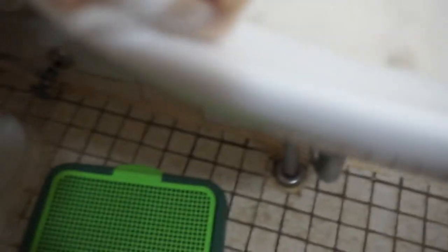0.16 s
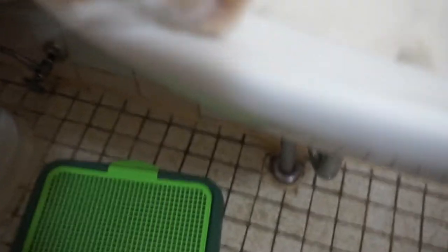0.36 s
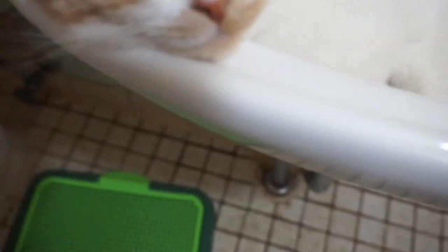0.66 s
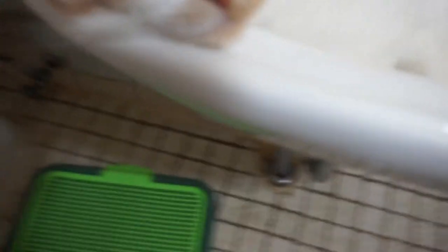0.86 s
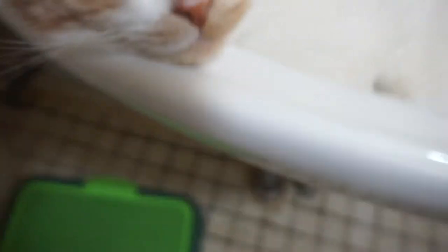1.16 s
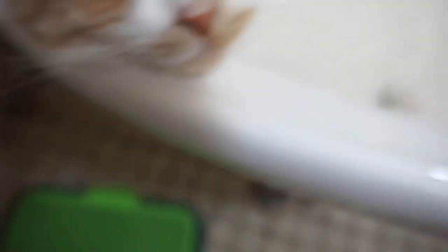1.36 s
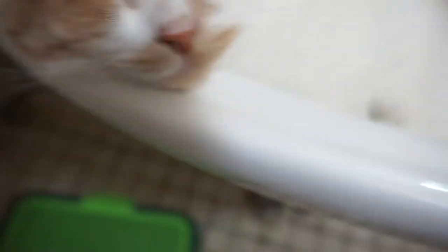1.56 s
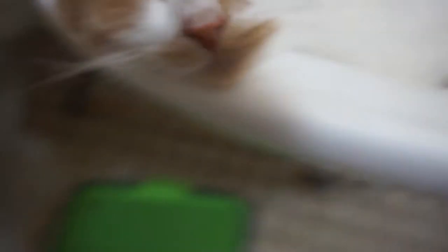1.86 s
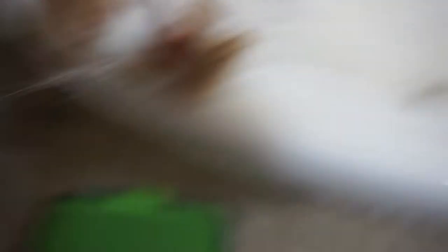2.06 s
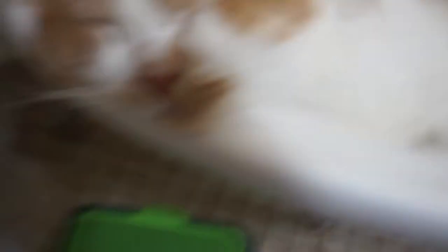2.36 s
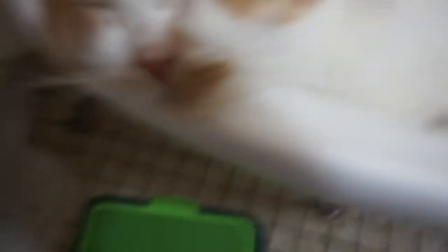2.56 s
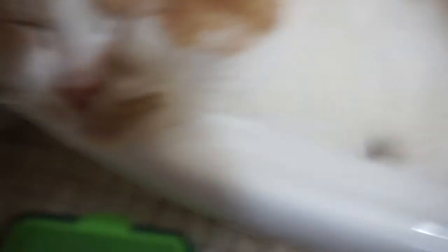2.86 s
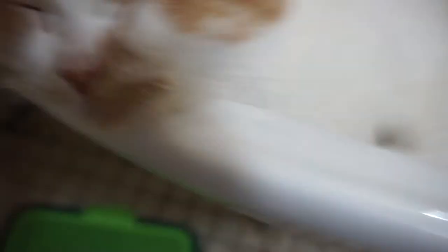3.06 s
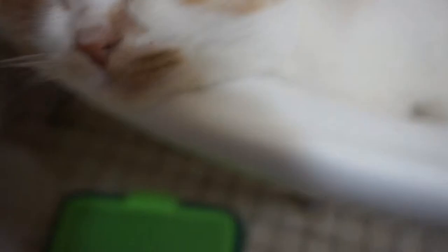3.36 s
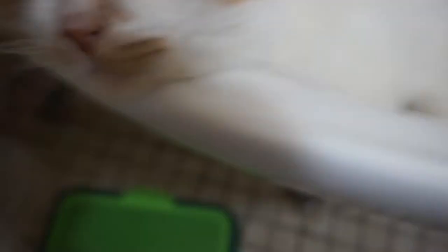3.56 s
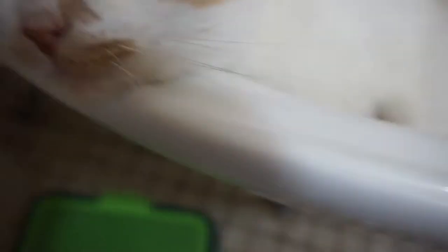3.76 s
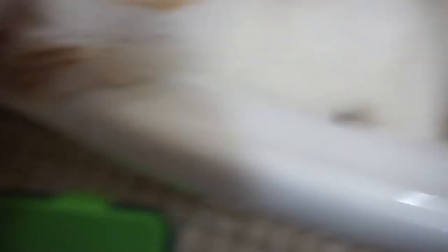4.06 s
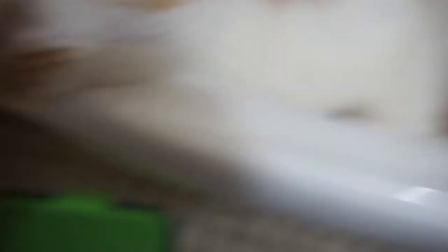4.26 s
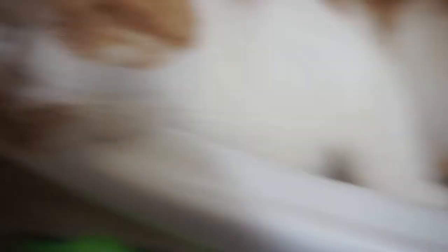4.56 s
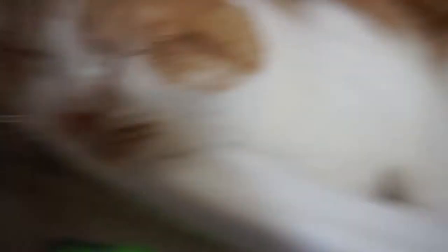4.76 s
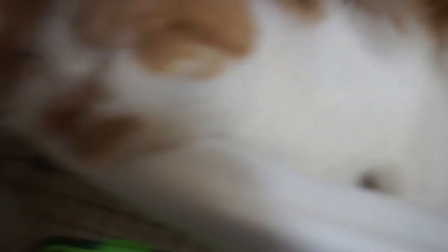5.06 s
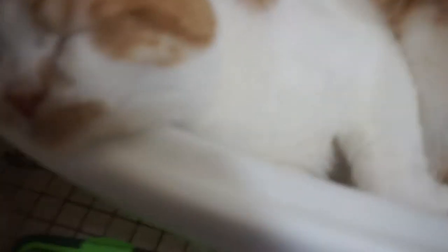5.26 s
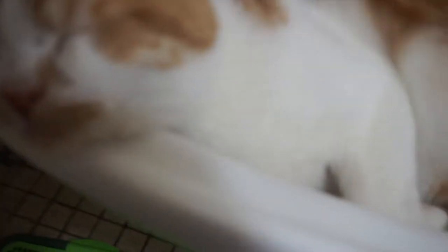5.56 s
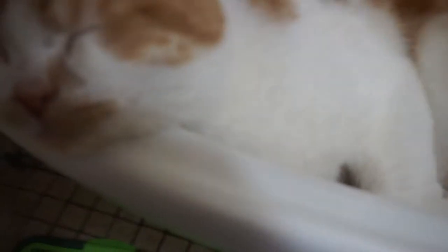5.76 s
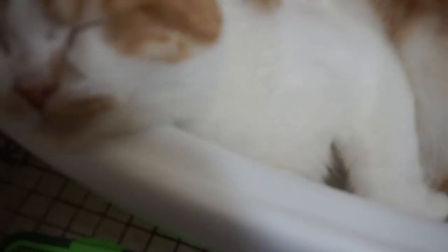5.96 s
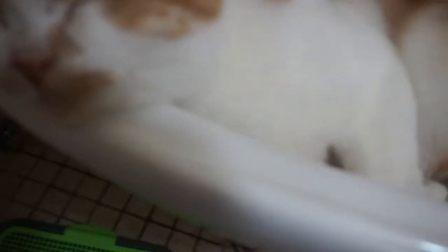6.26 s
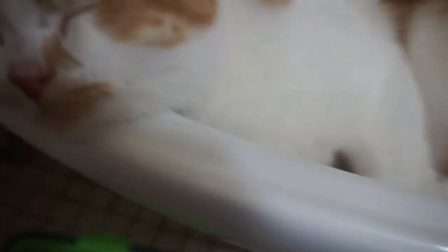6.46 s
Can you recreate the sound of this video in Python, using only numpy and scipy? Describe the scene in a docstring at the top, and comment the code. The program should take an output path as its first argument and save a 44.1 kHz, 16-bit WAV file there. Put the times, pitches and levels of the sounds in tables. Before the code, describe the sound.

A close stereo microphone catches short dry brush strokes on a cat's coat, with the basin knocked twice in the first second. For over three seconds the strokes become quick and regular, crowded with bouncing plastic ticks, soft thumps, little snaps and crackle. Then spaced, slightly whistling swishes return, with a final basin knock and a short tiled reflection.

```python
"""A brush sweeps a cat's fur in a small tiled bathroom, heard close: gritty rustle and faint room tone throughout,
slow strokes of hissing noise, and two early basin knocks (noise through resonant modes). Sparse snags (short
ringing puffs) and padded pats (low cycles under a slap) begin; then the work speeds up for a few seconds, with hard
bouncing plastic clicks (ticks over a hollow body), more snags and pats, and a crackle. Slow strokes return; the
basin is knocked once more. Click bodies, snags and slaps reach the left channel first."""
import sys
import numpy as np
from scipy import signal
from scipy.fft import rfft, irfft, next_fast_len
from scipy.io import wavfile
from scipy.ndimage import uniform_filter1d

SR = 44100
rng = np.random.default_rng(int(sys.argv[2]) if len(sys.argv) > 2 else 0)


def waveform_to_disk(signal):
    """Save audio, clipped to [-1, 1], as 16-bit WAV at the path in sys.argv[1]."""
    frames = np.transpose(np.atleast_2d(signal))
    scaled = np.clip(frames, -1, 1) * 32767
    samples = np.round(scaled).astype(np.int16)
    wavfile.write(sys.argv[1], SR, samples)


N = 292383
BUSY_START_S, BUSY_END_S = 1.68, 5.15  # the fast work

# Coat shifting under hand and brush: [t/s, level/dB]
COAT_RUSTLE = [(0.0, -63), (0.87, -66.5), (1.29, -65), (1.92, -54.5), (2.27, -56.5), (2.6, -49.5),
               (2.73, -60), (2.95, -75), (3.14, -58.5), (3.4, -67.5), (3.55, -59.5), (4.08, -64.5),
               (4.32, -60), (5.13, -58), (5.37, -67.5), (6.35, -67.5), (6.63, -75)]
# Bright spectrum of plastic ticks and basin cracks: [f/Hz, relative density/dB]
TICK_SPECTRUM = [(2400, -73), (4000, -30), (5400, -1.5), (7400, -1), (8600, -1), (9600, 8.5), (11100, 3),
                 (12300, -9), (16000, -102)]


def amp(db):
    """Amplitude factor of a level in dB."""
    return 10 ** (np.asarray(db) / 20)


def unit(x):
    """x scaled to rms 1."""
    return x / np.sqrt(np.mean(x ** 2) + 1e-20)


def along(points, hz):
    """Interpolates (Hz, value) points on a log frequency axis."""
    f, v = np.transpose(points)
    return np.interp(np.log(hz + 1), np.log(f + 1), v)


def filtered(x, response):
    """x filtered by a complex response of frequency."""
    size = next_fast_len(x.shape[-1] + 8192)
    spectrum = rfft(x, size) * response(np.fft.rfftfreq(size, 1 / SR))
    return irfft(spectrum, size)[..., :x.shape[-1]]


def causal(points):
    """Minimum-phase impulse response of energy 1 with this spectrum, by folding the cepstrum."""
    size = 2048
    magnitude = amp(along(points, np.fft.rfftfreq(size, 1 / SR)))
    cepstrum = irfft(np.log(np.maximum(magnitude, 1e-6)))
    cepstrum[1:size // 2] *= 2
    cepstrum[size // 2 + 1:] = 0
    impulse = irfft(np.exp(rfft(cepstrum)))[:size // 2]
    return impulse / np.linalg.norm(impulse)


def coloured(track, points):
    """Stereo track given a causal spectrum."""
    return signal.fftconvolve(track, causal(points)[None], axes=1)[:, :N]


def swell(t, top_s, blunt):
    """Contact force that builds to 1 at top_s and lets go again."""
    return (t / top_s * np.exp(1 - t / top_s)) ** blunt


def burst(top_s, blunt, apart):
    """Short stereo noise puff of set energy: a common part plus `apart` times one that differs per channel."""
    shape = swell(np.arange(SR // 20) / SR, top_s, blunt)
    common = rng.standard_normal(len(shape))
    puff = shape * (common + apart * rng.standard_normal((2, len(shape))))
    return unit(puff) * np.sqrt(np.mean(shape ** 2) * (1 + apart ** 2))


def add(track, s, sound):
    """Mixes a sound into the track at s seconds, cut at the end."""
    part = track[..., round(s * SR):][..., :sound.shape[-1]]
    part += sound[..., :part.shape[-1]]


def from_left(x, pan_db):
    """Delays the right channel so the left leads; pan_db is left over right."""
    lag_samples = 10
    return np.array([x[0] * amp(pan_db / 2), np.roll(x[1], lag_samples) * amp(-pan_db / 2)])


def rush(spectrum, likeness, patchy_db, grit_db):
    """Stereo friction noise of rms 1: a fast random gain makes grit, a random time-frequency gain makes patches."""
    grit = amp(grit_db * unit(uniform_filter1d(rng.standard_normal(N), size=24)))
    z = signal.stft(grit * rng.standard_normal((2, N)), nperseg=256)[2]
    field = uniform_filter1d(rng.standard_normal(z.shape[1:]), size=4, axis=0)
    field = uniform_filter1d(field, size=8, axis=1)
    pair = signal.istft(z * amp(patchy_db * unit(field)), nperseg=256)[1][:, :N]

    def mid_side(hz):
        # Mid/side split that yields the wanted left-right correlation
        angle = np.arccos(np.clip(along(likeness, hz), -1, 1)) / 2
        return amp(along(spectrum, hz)) * [np.cos(angle), np.sin(angle)]

    mid, side = filtered(pair, mid_side)
    return unit(np.array([mid + side, mid - side]))


def background():
    """Low gritty friction of the coat over a faint, steady room tone."""
    # Coat rustle spectrum: [f/Hz, relative density/dB]
    fur_spectrum = [(35, -37), (60, -25), (390, 3), (607, 10.5), (707, 5), (913, 7), (1660, -23),
                    (1930, -8.5), (3500, -2), (4550, -58), (7700, -120)]
    # Room tone spectrum: [f/Hz, relative density/dB]
    air_spectrum = [(300, -8), (1500, 3.5), (3000, -11), (4200, -9), (5500, -11), (10500, -10.5),
                    (11500, -25)]
    # Left-right likeness of both: [f/Hz, correlation/1]
    diffuse = [(130, 0.64), (500, 0.58), (1700, 0.041), (3500, 0.077), (9000, 0.35)]
    s, db = np.transpose(COAT_RUSTLE)
    envelope = amp(np.interp(np.arange(N) / SR, s, db))
    rustle = envelope * rush(fur_spectrum, diffuse, patchy_db=4.5, grit_db=4.1)
    return rustle + amp(-64.5) * rush(air_spectrum, diffuse, patchy_db=4.0, grit_db=-1.0)


def strokes():
    """Blunt-topped bristle hiss; firmer strokes rub the fur more, lower down; slow ones whistle and lie right."""
    # Brush strokes: [peak t/s, bristle hiss level before whistle and lean/dB, nominal half-length/ms]
    stroke_table = [(0.081, -45.5, 9.3), (0.115, -44, 19), (0.164, -56.5, 26), (0.407, -44, 17.8),
                    (0.468, -55.5, 22), (0.692, -42.5, 11), (0.75, -48.5, 57), (0.953, -43.5, 26.5),
                    (1.061, -53.5, 44), (1.179, -47, 30), (1.381, -40.5, 23), (1.487, -44, 21),
                    (1.572, -41.5, 24.7), (1.671, -44, 23.5), (1.754, -41, 22), (1.919, -46, 94),
                    (2.14, -49, 98), (2.223, -40.5, 13), (2.303, -44.5, 26), (2.486, -46.5, 105),
                    (2.6, -41, 30), (2.712, -42, 20), (2.82, -53.5, 28), (2.907, -47, 27), (3.01, -47, 25),
                    (3.105, -45, 28), (3.211, -42, 25), (3.308, -47.5, 23), (3.408, -47, 23),
                    (3.504, -45, 20), (3.613, -43, 31), (3.715, -47.5, 24), (3.832, -45, 29),
                    (3.92, -48.5, 27), (4.038, -47.5, 42), (4.13, -44, 22), (4.242, -44.5, 35),
                    (4.34, -46.5, 35), (4.44, -48.5, 41), (4.535, -46.5, 31), (4.641, -46, 33),
                    (4.75, -41.5, 26.6), (4.856, -47.5, 25), (4.962, -37, 22.5), (5.075, -52.5, 46),
                    (5.269, -39.5, 39), (5.447, -55.5, 38), (5.631, -39, 33), (5.75, -55.5, 74),
                    (5.915, -48.5, 7.9), (5.991, -40.5, 32), (6.28, -56, 15), (6.354, -39.5, 24.6),
                    (6.49, -58.5, 47), (6.625, -52, 18)]
    # Bristle hiss spectrum: [f/Hz, relative density/dB]
    bristle_spectrum = [(1060, -38), (1800, -16), (2380, -13.5), (2690, -10.5), (2960, -12), (3820, -17),
                        (5090, -13.5), (5630, -9.5), (7110, -12), (10600, -8.5), (11200, -6.5),
                        (11500, -96), (15000, -66), (22000, -120)]
    # Fur rub spectrum: [f/Hz, relative density/dB]
    rub_spectrum = [(150, -57), (250, -11.5), (1240, 3.5), (1720, -7), (2270, -6.5), (3610, -15.5),
                    (5000, 1), (6500, -120)]
    # Left-right likeness: [f/Hz, correlation/1]
    likeness = [(60, 0.7), (500, 0.82), (1700, 0.56), (3500, 0.18), (9000, 0.68)]
    # Balance of slow strokes: [f/Hz, left over right/dB]
    lean = [(500, -1.5), (1700, -2), (3500, -3.5), (9000, -0.8)]
    rise_share, fall_share = 0.79, 0.85  # of a stroke's half-length
    edge_db, blunt, steepen = 9.5, 0.61, 0.79  # flank fall scale, roundness of top, flank exponent
    firm_hiss_db, firm_rub_db, rub_db_per_hiss_db = -41.5, -51, 1.64
    slow_rub_db = -0.5  # added to the rub of slow strokes
    whistle_hz, whistle_width_hz, whistle_db = 5580, 350, -2.2

    hiss_power, rub_power, t = np.zeros(N), np.zeros(N), np.arange(N) / SR
    slow = (t < BUSY_START_S) | (t > BUSY_END_S)
    for s, hiss_db, half_ms in stroke_table:
        share = np.where(t < s, rise_share, fall_share)
        u = 1000 * (t - s) / max(half_ms, 4) / share
        shape_db = -edge_db * (np.hypot(u, blunt) - blunt) ** steepen
        rub_db = firm_rub_db + rub_db_per_hiss_db * (hiss_db - firm_hiss_db) + slow_rub_db * slow
        hiss_power += amp(shape_db + hiss_db) ** 2
        rub_power += amp(shape_db + rub_db) ** 2
    hiss = np.sqrt(hiss_power) * rush(bristle_spectrum, likeness, patchy_db=2.5, grit_db=2.0)
    rub = np.sqrt(rub_power) * rush(rub_spectrum, likeness, patchy_db=-1.5, grit_db=1.0)
    both = hiss + rub

    def slow_response(hz):
        whistle = 1 + amp(whistle_db) / (1 + ((hz - whistle_hz) / whistle_width_hz) ** 2)
        return whistle * amp(np.outer([.5, -.5], along(lean, hz)))

    return both * ~slow + filtered(both * slow, slow_response)


def knocks():
    """Struck basin: decaying noise, flaring briefly at the start, drives its modes; little radiates below the
    lowest."""
    # Basin knocks: [t/s, ring drive/dB, crack level/dB, upper-mode drive over ring/dB]
    knock_table = [(0.451, -37.5, -40.5, -11), (0.73, -32, -26.5, -5.5), (5.661, -30, -26, 1)]
    # Basin modes: [centre f/Hz, width/Hz, gain/dB]
    basin_modes = [(365, 390, 0), (562, 60, 17), (1158, 140, 10.5), (1493, 170, -1), (2010, 220, 3.5),
                   (2950, 170, 1.5), (3300, 370, -1.5)]
    upper_hz = 1700  # modes above this follow the upper-mode drive

    low, high, crack = np.zeros(N), np.zeros(N), np.zeros((2, N))
    t = np.arange(SR // 3) / SR
    for s, ring_db, crack_db, upper_db in knock_table:
        sustain = amp(-60 * t / 0.29)  # T60 in s
        flare = 1.5 * amp(upper_db - 60 * t / 0.019)
        shake = (sustain + flare) * rng.standard_normal(len(t))
        add(low, s, amp(ring_db) * shake)
        add(high, s, amp(ring_db + upper_db) * shake)
        add(crack, s, amp(crack_db) * burst(top_s=.0005, blunt=1.1, apart=.4))

    def modes(upper):
        def response(f):
            total = 0
            for k, (centre, width, db) in enumerate(basin_modes):
                if (centre > upper_hz) == upper:
                    band = 1j * f * width / (centre ** 2 - f * f + 1j * f * width)
                    total = total + (-1) ** k * amp(db) * band
            return total
        return response

    ring = filtered(low, modes(False)) + filtered(high, modes(True))
    ring = filtered(ring, lambda f: (1j * f / (260 + 1j * f)) ** 2)
    return ring, coloured(crack, TICK_SPECTRUM)


def snag(peak_db, hz):
    """A bristle snaps free: a noise puff rings for a cycle or two at its own pitch."""
    t = np.arange(SR // 100) / SR
    ring = np.exp(-hz * t) * np.sin(2 * np.pi * hz * t)
    puff = burst(top_s=0.0006, blunt=1.2, apart=0.9)[:, :len(t)]
    sound = signal.fftconvolve(puff, ring[None], axes=1)
    return amp(peak_db) * sound / np.abs(sound).max()


def snags(count, db):
    """Clear snags, plus a random crackle through the fast work whose level follows the coat rustle."""
    # Bristle catches and snaps free: [t/s, peak level before high-pass and pan/dB, ring f/Hz]
    snag_table = [(0.88, -28.5, 1790), (0.92, -37, 3280), (1.545, -34.5, 2300), (1.611, -31, 2230),
                  (1.657, -28.5, 1910), (1.773, -34, 2000), (2.178, -27, 2480), (2.212, -29, 2020),
                  (2.225, -30, 880), (2.236, -35, 1310), (2.347, -31, 1300), (2.369, -26.5, 3300),
                  (2.437, -37, 929), (2.516, -31, 2000), (2.575, -27, 2900), (2.912, -34, 2300),
                  (3.079, -33, 2700), (3.494, -41, 2000), (3.706, -34, 2000), (3.905, -35, 2200),
                  (3.947, -33.5, 1920), (3.966, -39, 3300), (3.984, -39, 3300), (4.304, -41, 1880),
                  (4.321, -31, 3100), (4.532, -40, 2200), (4.779, -26.5, 1400), (5.042, -34, 3310)]
    track = np.zeros((2, N))
    for s, peak_db, hz in snag_table:
        add(track, s, snag(peak_db, hz))
    for u, v, w in rng.random((count, 3)):
        s = BUSY_START_S + u * (BUSY_END_S - BUSY_START_S)
        rustle_db = np.interp(s, *np.transpose(COAT_RUSTLE))
        add(track, s, snag(rustle_db + db - 3.0 * np.log(v), hz=700 * 6.5 ** w))
    thin = filtered(track, lambda f: (1j * f / (350 + 1j * f)) ** 2)
    return from_left(thin, pan_db=-0.5)


def pats():
    """Padded contact: a few uneven low cycles (two inharmonic sines) swell and stop under a short slap."""
    # Pats: [t/s, thump drive/dB, thump f/Hz]
    pat_table = [(1.105, -55.5, 980), (1.676, -42.5, 920), (1.728, -33.5, 660), (1.917, -32, 617),
                 (1.969, -40.5, 710), (2.037, -40, 705), (2.099, -29.5, 650), (2.276, -36.5, 1010),
                 (2.466, -32.5, 740), (2.66, -29, 540), (2.996, -42.5, 665), (3.061, -36, 890),
                 (3.254, -32.5, 520), (3.458, -39.5, 507), (3.587, -39, 625), (3.659, -36.5, 550),
                 (3.795, -35.5, 780), (3.866, -31, 534), (4.01, -39, 840), (4.076, -33, 670),
                 (4.22, -36.5, 760), (4.284, -29.5, 550), (4.448, -38, 714), (4.502, -30, 560),
                 (4.628, -38.5, 920), (4.708, -32.5, 720), (4.813, -35.5, 940), (4.916, -35.5, 1050),
                 (5.02, -31.5, 830), (5.095, -40, 590), (5.152, -34, 780), (5.287, -34, 824),
                 (5.364, -51.5, 930), (6.251, -55.5, 840)]
    # Slap spectrum: [f/Hz, relative density/dB]
    slap_spectrum = [(500, -2), (1000, 3.5), (1460, 2.5), (1750, 6), (2050, 7), (3200, -7), (5000, -21.5),
                     (9000, -41)]
    slap_over_thump_db = 1.4
    thump, slap, t = np.zeros(N), np.zeros((2, N)), np.arange(SR // 25) / SR
    for s, db, hz in pat_table:
        upper = np.sin(2 * np.pi * hz * t)
        lower = 0.66 * np.sin(2 * np.pi * (0.698 * hz * t + rng.random()))
        add(thump, s + 0.0008, amp(db) * swell(t, top_s=0.0027, blunt=2.4) * (upper + lower))
        add(slap, s, amp(db + slap_over_thump_db) * burst(top_s=0.0017, blunt=0.68, apart=0.56))
    thump = filtered(thump, lambda f: 1j * f / (200 + 1j * f))
    return thump * amp([[-1.4], [1.4]]) + from_left(coloured(slap, slap_spectrum), pan_db=1.0)


def clicks():
    """Hard plastic contact: bright tick over a hollow body, pitch varying with grip, one weaker bounce."""
    # Clicks: [t/s, hollow body drive/dB, bright tick over body/dB]
    click_table = [(1.8, -27.5, -27), (1.808, -30, -9), (1.8255, -35, -10), (1.8415, -21, -0.5),
                   (1.9497, -39, 3), (1.9937, -40, -18), (1.999, -19.5, 1.5), (2.071, -45, 6),
                   (2.143, -38, -17), (2.1567, -33, 4), (2.3562, -38.5, 2), (2.378, -20.5, 2.5),
                   (2.3845, -26, 3), (2.4582, -33.5, -16), (2.537, -27.5, -20), (2.5503, -22.5, 3.5),
                   (2.5877, -32.5, -4), (2.744, -22.5, 4.5), (2.772, -44.5, 2), (2.893, -45, -12),
                   (2.9392, -28, -3), (2.95, -42, -11), (2.98, -42, 2.5), (3.13, -31.5, -22),
                   (3.1526, -23.5, 5.5), (3.184, -36, -15), (3.268, -43, -11), (3.299, -39, -14),
                   (3.325, -41, 2), (3.3389, -37, 3.5), (3.342, -21.5, 2.5), (3.3708, -46, 1),
                   (3.524, -48, 7), (3.538, -36, -26), (3.549, -22, 5), (3.572, -33.5, -11),
                   (3.727, -29.5, -12), (3.739, -40, -17), (3.7584, -22.5, -0.5), (3.78, -34, -1),
                   (4.017, -34, 2.5), (4.095, -46, 2), (4.108, -42, -5), (4.118, -44, 10), (4.143, -29, -8),
                   (4.1672, -24, 4.5), (4.2, -33.5, -10), (4.3607, -33, -18), (4.3935, -26.5, -0.5),
                   (4.644, -32.5, -3), (4.476, -46, -14), (4.601, -42, -11), (4.914, -38, -1.5),
                   (4.9922, -37, -8), (4.999, -33, -6), (5.061, -35, -2), (5.0752, -37, 6),
                   (5.081, -31, -2)]
    # Hollow body spectrum: [f/Hz, relative density/dB]
    body_spectrum = [(240, -72), (400, -34), (932, -4), (1190, -8.5), (1910, -3.5), (2340, -11.5),
                     (3350, -0.5), (4100, -16.5), (5000, -12.5), (6500, -39), (11000, -120)]
    # Contact and bounce: [delay after click/s, level/dB]
    bounces = [(0, -2.5), (.0066, -15)]
    grip_spread = 0.07  # standard deviation of log pitch
    tick, body, hollow = np.zeros((2, N)), np.zeros((2, N)), causal(body_spectrum)
    index = np.arange(len(hollow))
    for (s, body_db, bright_db), grip in zip(click_table, rng.standard_normal(len(click_table))):
        ring = np.interp(index * np.exp(grip_spread * grip), index, hollow, right=0)
        for late_s, db in bounces:
            tick_puff = burst(top_s=0.00056, blunt=1.1, apart=0.93)
            add(tick, s + late_s, amp(body_db + bright_db + db) * tick_puff)
            body_puff = burst(top_s=0.00095, blunt=0.72, apart=0.94)
            add(body, s + late_s, amp(body_db + db) * signal.fftconvolve(body_puff, ring[None], axes=1))
    return coloured(tick, TICK_SPECTRUM) + from_left(body, pan_db=-1.5)


def room(x):
    """Tiled walls: a stereo noise tail in which each frequency dies at its own speed."""
    # Reverberation: [f/Hz, T60/s]
    decay = [(300, 0.15), (1500, 0.076), (5000, 0.11), (11000, 0.059)]
    hz, t, z = signal.stft(rng.standard_normal((2, SR // 2)), SR, nperseg=256)
    tail = signal.istft(z * amp(-60 * t / along(decay, hz)[:, None]), SR, nperseg=256)[1]
    return signal.fftconvolve(x[None], tail / np.linalg.norm(tail[0]), axes=1)[:, :N]


def scene():
    """Mixes direct sounds, room answers, strokes and background."""
    ring, crack = knocks()
    contacts = snags(count=320, db=11.5) + pats() + clicks()
    direct = contacts + (ring + crack) * amp([[-.4], [.4]])
    echoes = amp(-11.5) * room(contacts[0] + crack[0]) + amp(-5) * room(ring)
    return direct + echoes + strokes() + background()


def record(dry):
    """Thin bass, a steep fall at the top and nothing above the band limit."""
    # Pickup response: [f/Hz, gain/dB]
    pickup = [(60, -24), (300, 0), (10900, 0), (11300, -18), (12300, -26)]
    top_hz = 12365
    return filtered(dry, lambda hz: amp(along(pickup, hz)) * (hz < top_hz))


dry = scene()
out = record(dry)
waveform_to_disk(out)
```